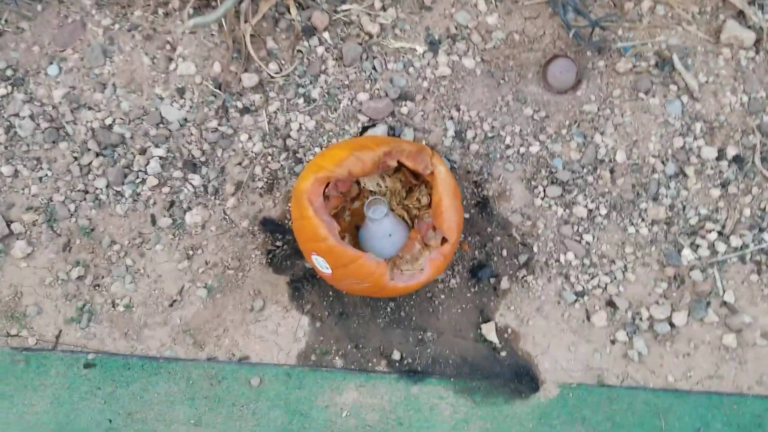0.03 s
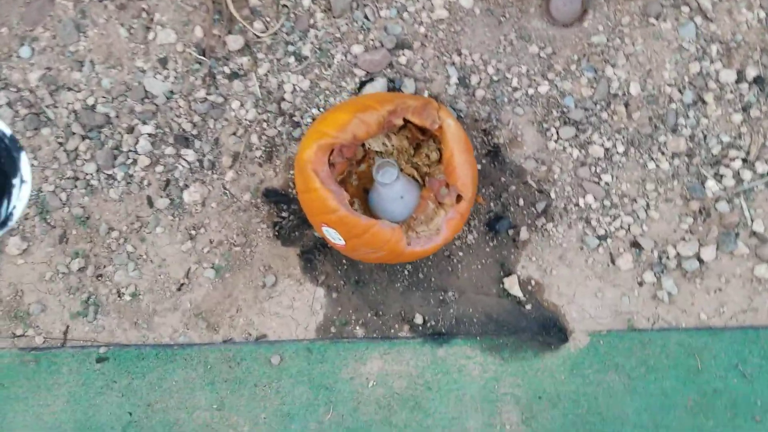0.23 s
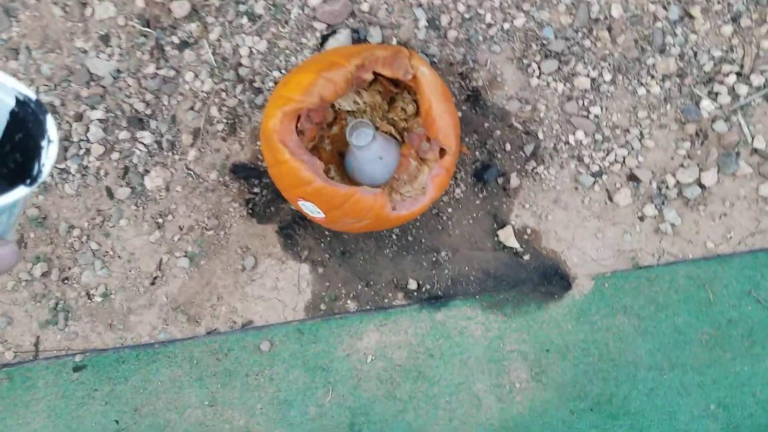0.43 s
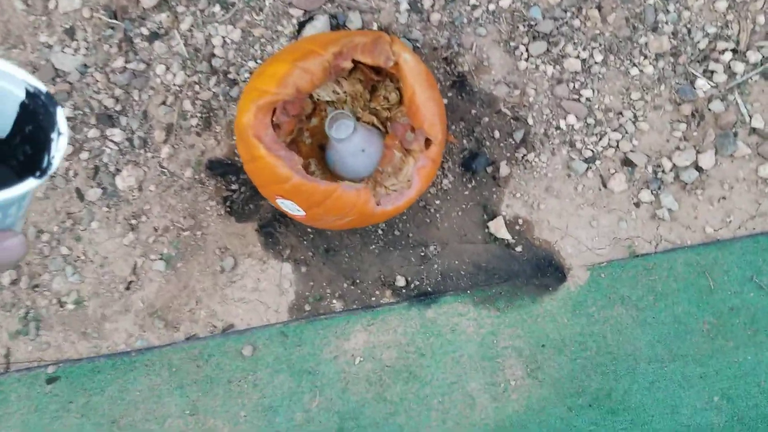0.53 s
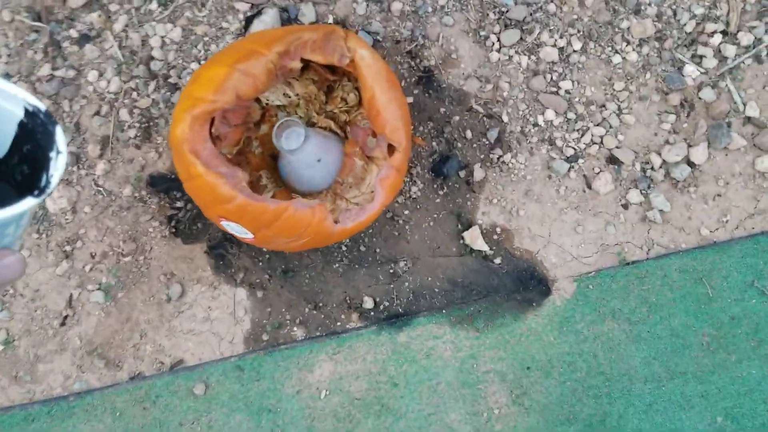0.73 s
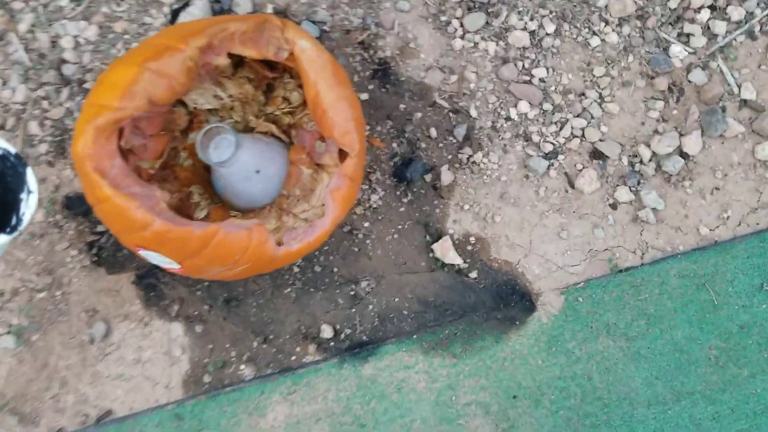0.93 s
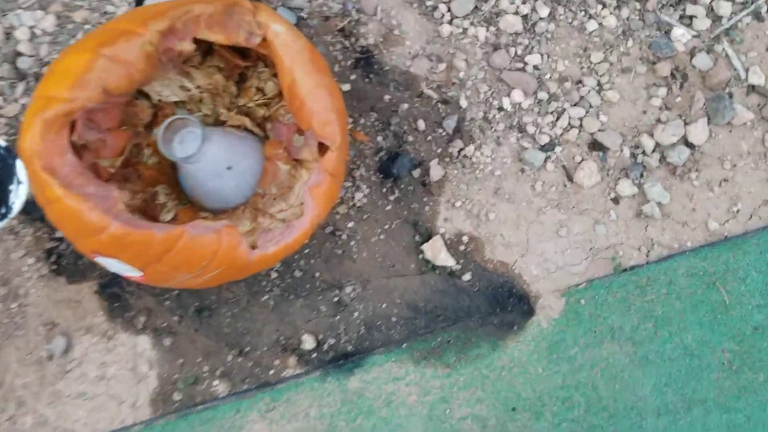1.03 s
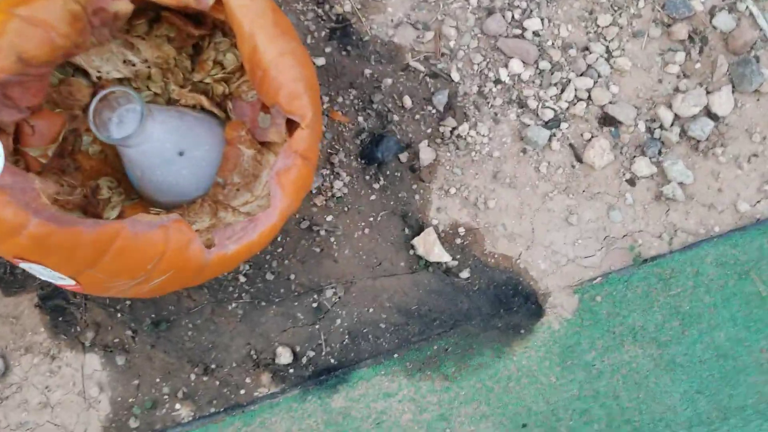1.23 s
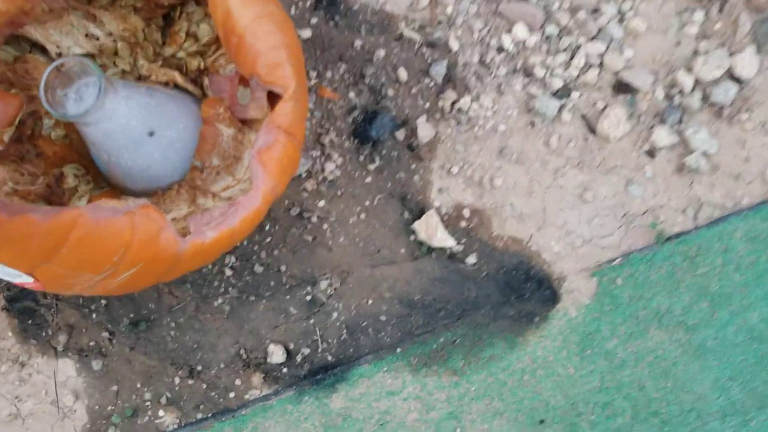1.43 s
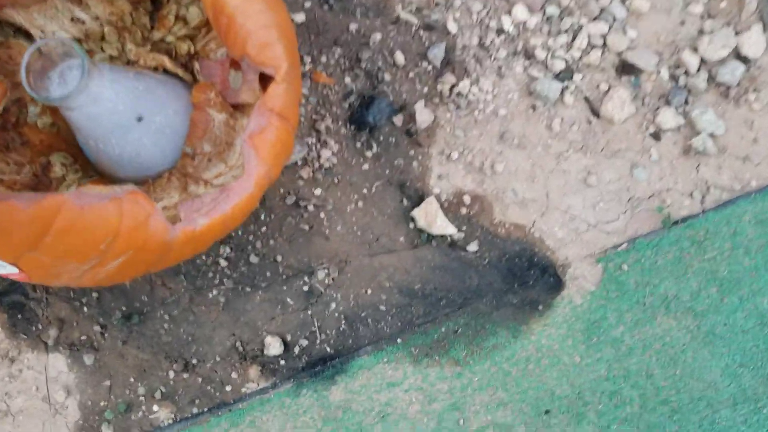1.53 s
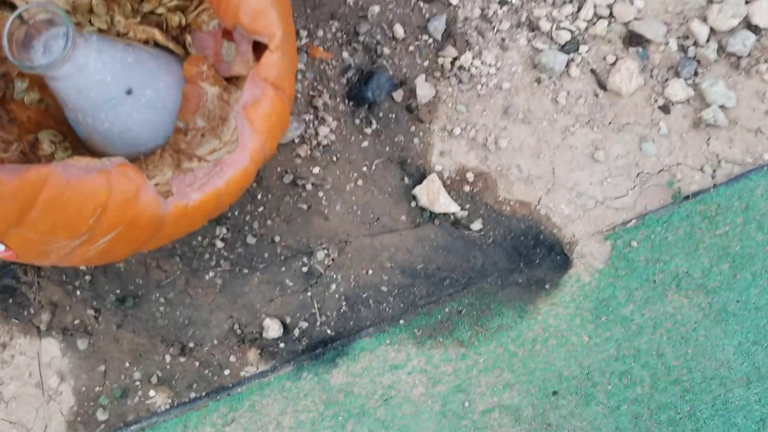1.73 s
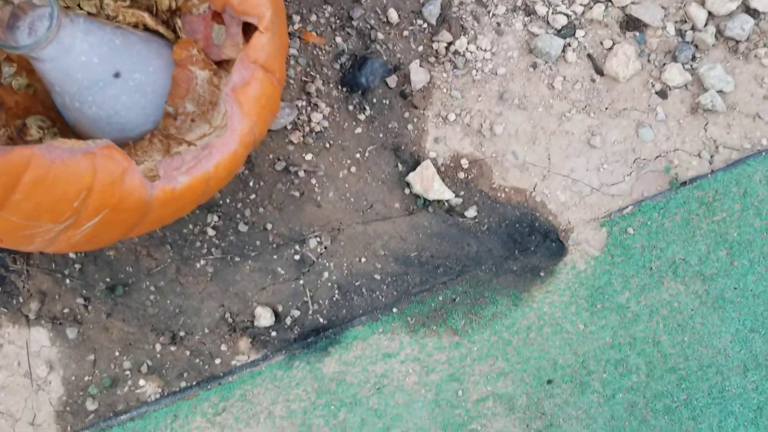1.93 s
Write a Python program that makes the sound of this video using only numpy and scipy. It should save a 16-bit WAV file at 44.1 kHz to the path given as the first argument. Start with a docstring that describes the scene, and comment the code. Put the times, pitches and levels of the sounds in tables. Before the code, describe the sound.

Fizzy hissing rises for about a second and dies away over low wind rumble.

```python
"""Outdoors, close to the ground: a fizzing hiss swells for about a second and fades.
The hiss is a jet of noise ringing at a few pitches, with a faint thin whistle before and after.
Swirls of moving air buffet the two ports (sound openings) of a hand-held microphone, and now and
then a big swirl thumps them. Two tiny hard contacts make dry ticks over a quiet background."""
import sys
import numpy as np
from scipy import signal
from scipy.fft import rfft, irfft, next_fast_len
from scipy.io import wavfile
from scipy.ndimage import uniform_filter1d, map_coordinates

SR = 44100
rng = np.random.default_rng(int(sys.argv[2]) if len(sys.argv) > 2 else 0)


def pcm_store(signal):
    """Save signal as 16-bit PCM."""
    levels = np.round(np.clip(np.atleast_2d(signal), -1, 1) * 32767)
    wavfile.write(sys.argv[1], SR, levels.astype(np.int16).T)


N = 88200  # 2 seconds

# Tone of small, fast swirls of air: pitch_hz, relative_db
FLUTTER_TONE = [(60, -20), (150, -3), (240, -1), (400, -6.5), (620, -24.5), (1200, -40.5), (4000, -52)]


def hiss():
    """A jet of noise with a ringing body and an airy top; it reaches the left port first."""
    # The swell and fade: time_s, level_db, top_boost_db
    swell = [(.24, -69.5, -3), (.32, -54, -2), (.39, -58, -2), (.55, -47, -1), (.68, -46.5, 0),
             (.85, -43.5, -2), (1.0, -45.5, -1), (1.1, -44, -4.5), (1.15, -51, -4), (1.22, -54, -5),
             (1.28, -62.5, -2), (1.335, -68, 6), (1.42, -64, 2.5), (2, -69.5, -15)]
    # Broad ringing peaks of the body: pitch_hz, relative_db
    body_tone = [(500, -13), (1000, -13), (1600, -14.5), (2100, -4), (2750, -10.5), (3300, -9.5),
                 (3900, -9), (4400, -4.5), (4780, 1), (5100, -6), (5500, -8), (6100, -19), (6900, -7),
                 (8000, -21), (10000, -24), (16000, -22)]
    # Tone of the airy top: pitch_hz, relative_db
    top_tone = [(4000, -38), (7000, -9), (9000, -11), (10000, -18), (11300, -3.5), (12500, 1), (14000, -4),
                (15700, -1)]
    # How alike left and right are: pitch_hz, likeness (1 = the same)
    likeness = [(700, 0.25), (2050, 1), (3300, 0.37), (4800, 1), (8000, 0.77), (13000, 0.46)]
    # How far the left wave runs ahead of the right: pitch_hz, lead_radians
    left_lead = [(1000, 0), (2100, -.1), (3000, 1.1), (3900, 1.0), (4800, 1.5), (5200, 1.7), (5700, 3),
                 (8300, 3.3), (10000, 6), (12700, 6.2), (15000, 7.5)]
    level_db, top_db = curves(swell)
    flow_db = level_db + .6 * wobble(25)
    ringing = rush(body_tone, likeness, patchy_db=2.12) + amp(-8.5) * sharp_ring()
    body = amp(flow_db) * pan(-2) * ringing
    top = amp(top_db + flow_db) * pan(2.5) * rush(top_tone, likeness, patchy_db=2.5)
    head_start = lambda hz: np.exp(.5j * np.array([[1], [-1]]) * along(left_lead, hz))
    return filtered(body + top, head_start)


def sharp_ring():
    """The sharpest ring in the hiss: a narrow band of noise that wanders in pitch."""
    # Middle of the band: time_s, pitch_hz
    pitch_path = [(.3, 4750), (.55, 4796), (.68, 4840), (.77, 4730), (.86, 4653), (.93, 4770), (1.03, 4700),
                  (1.12, 4780), (1.22, 4560)]
    pitch_hz, = curves(pitch_path)
    half_width_hz = 160
    keep_lows = lambda hz: 1 / np.hypot(1, (hz / half_width_hz) ** 2)
    slow_a, slow_b = filtered(rng.standard_normal((2, N)), keep_lows)
    phase = 2 * np.pi * np.cumsum(pitch_hz) / SR
    return unit(slow_a * np.cos(phase) + slow_b * np.sin(phase))  # lifts the noise to that pitch


def whistles():
    """Brief, thin, unsteady tones while the flow is weak."""
    # One row per whistle: middle_s, half_length_s, pitch_hz, level_db
    notes = [(0.079, 0.036, 4490, -62), (1.294, 0.084, 3210, -66.5), (1.34, 0.028, 4600, -60),
             (1.52, 0.042, 4850, -69)]
    waver_hz = 48
    out = np.zeros(N)
    for middle_s, half_length_s, pitch_hz, level_db in notes:
        t = np.arange(N) / SR - middle_s
        phase = 2 * np.pi * np.cumsum(pitch_hz + waver_hz * wobble(300)) / SR
        flicker_db = 2 * wobble(80)
        fade = np.exp(-(t / half_length_s) ** 2)
        out += amp(level_db + flicker_db) * fade * np.sqrt(2) * np.sin(phase)
    return out * pan(2.3)


def buffeting():
    """Air on the ports makes a deep rumble and a lighter flutter, shared more evenly between them."""
    # Strength of the air: time_s, level_db, left_minus_right_db
    air = [(0, -57, -22.5), (.1, -48, -18), (.16, -44, 14), (.3, -48, 8), (.35, -48, -15), (.47, -44, -4),
           (.57, -30.5, -17), (.68, -39.5, -3), (.74, -28.5, 1), (.86, -39.5, -7), (1.0, -30.5, 1),
           (1.09, -37, -17), (1.29, -35.5, 2.5), (1.44, -45, -21), (1.51, -33, -16), (1.65, -50.5, -19),
           (1.75, -41.5, -17), (1.88, -52.5, -26), (2.0, -39.5, 11.5)]
    # Tone of slow swirls: pitch_hz, relative_db
    rumble_tone = [(20, -35.5), (50, 4), (85, -2.5), (130, -1.5), (220, -16.5), (400, -32.5), (800, -47.5),
                   (2000, -98)]
    level_db, pan_db = curves(air)
    gust_db = level_db - level_db.mean()
    flutter_db = -10.5 + 1.43 * gust_db  # in a gust, fast swirls grow more than slow ones
    rumble = amp(gust_db) * pan(pan_db) * swirls(rumble_tone, lumpy_db=3.0)
    flutter = amp(flutter_db) * pan(0.52 * pan_db) * swirls(FLUTTER_TONE, lumpy_db=6.5)
    return amp(level_db.mean()) * (rumble + flutter)


def swirls(tone, lumpy_db):
    """Churning air, steady overall, in quick lumps that differ from port to port."""
    noise = rush(tone, [(100, 0.033)], patchy_db=3.5)
    local_power = np.abs(uniform_filter1d(noise ** 2, size=2600, axis=1))
    steady = noise / np.sqrt(local_power + 1e-9)
    lumps = amp(lumpy_db * np.array([wobble(45.14), wobble(45)]))
    return unit(steady * lumps)


def thumps():
    """Each big swirl briefly swings the air pressure at the ports and carries a little flutter."""
    # One row per swirl: middle_s, level_db, pitch_hz, half_length_s, left_minus_right_db
    big_swirls = [(0.203, -29.5, 95, 0.0047, -0.5), (.246, -35.5, 55.4, 0.0078, 5),
                  (.388, -30, 72, 0.0051, 1), (.479, -26, 93.5, 0.0075, 4), (.563, -29, 85.6, 0.01, -13),
                  (.72, -21, 92, 0.0058, 1), (.752, -27.5, 216, 0.0094, -1), (.795, -24, 112, 0.005, -8),
                  (.905, -28, 80.5, 0.0057, -6), (.974, -19.5, 166.4, 0.003, -1.5),
                  (1.185, -27.5, 139.5, 0.0052, -9), (1.26, -22, 126.8, 0.0026, -4),
                  (1.327, -17.5, 93, 0.0068, 0), (1.502, -31, 122, 0.0093, -32),
                  (1.733, -32, 74.5, 0.0052, -9), (1.803, -30.5, 60.3, 0.0058, -20)]
    out = np.zeros((2, N))
    flutter = amp(-12.5) * rush(FLUTTER_TONE, [(100, 0.36)], patchy_db=0)
    for middle_s, level_db, pitch_hz, half_length_s, pan_db in big_swirls:
        t = np.arange(N) / SR - middle_s
        start_turn, right_shift = rng.random(2)
        phase = 2 * np.pi * (pitch_hz * t + start_turn)
        swing = np.sin(phase + np.array([[0], [1.5]]) * right_shift)  # the ports are out of step
        fade = 1 / np.cosh(np.clip(t / half_length_s, -20, 20))
        out += amp(level_db) * pan(pan_db) * fade * (swing + flutter)
    return out


def ticks():
    """Tiny hard contacts: a short ring and a rough crack, gone within milliseconds."""
    # One row per tick: start_s, level_db, left_minus_right_db, treble_limit_hz
    contacts = [(.925, -26, 1, 1297), (1.858, -19, -13.5, 10000)]
    # Tones that each contact sets ringing: pitch_hz, relative_db
    ring_tones = [(750, -2), (1700, -1.5), (2900, -3.5), (4600, 0), (7000, -9), (12500, 5)]
    ring_s, crack_db = 0.0021, -13
    out = np.zeros((2, N))
    for start_s, level_db, pan_db, treble_limit_hz in contacts:
        t = np.maximum(np.arange(N) / SR - start_s, 0)
        ring = sum(amp(db) * np.sin(2 * np.pi * hz * t) for hz, db in ring_tones)
        crack = amp(crack_db) * rng.standard_normal((2, N))
        fade = (t > 0) * amp(-60 * t / ring_s)
        tick = filtered((ring + crack) * fade, lambda hz: 1 / (1 + 1j * hz / treble_limit_hz) ** 2)
        out += amp(level_db) * pan(pan_db) * tick / np.abs(tick).max()
    return out


def background():
    """Distant outdoor noise and a faint high fizz."""
    # Loudness of the distant noise: time_s, level_db
    far_levels = [(0, -53.5), (.25, -53.5), (.7, -51), (1.3, -51), (1.7, -52.5), (2, -49.5)]
    # Its tone: pitch_hz, relative_db
    far_tone = [(30, 15), (120, -8), (380, 3), (650, 1), (1100, -0.5), (1600, -2.5), (2300, -3),
                (3200, -11.5), (4600, -16.5), (5700, -24), (7000, -18), (8300, -32.5), (16000, -46)]
    # How alike its left and right are: pitch_hz, likeness
    far_likeness = [(300, 0.48), (700, 0.42), (1400, -0.51), (3000, 0.27)]
    # Loudness of the fizz: time_s, level_db
    fizz_levels = [(0, -64.5), (.22, -63.5), (1.3, -59), (1.55, -58.5), (1.8, -59), (2, -58)]
    # Its tone: pitch_hz, relative_db
    fizz_tone = [(2000, -21), (4600, -5.5), (6000, -3), (8300, -9.5), (10000, -5.5), (12500, -4.5),
                 (15700, -1.5)]
    far_db, = curves(far_levels)
    fizz_db, = curves(fizz_levels)
    far = amp(far_db + .8 * wobble(9)) * rush(far_tone, far_likeness, patchy_db=2.47)
    fizz_gain = amp(fizz_db + 0.48 * wobble(13.6)) * pan(5.6)
    return far + fizz_gain * rush(fizz_tone, [(5000, 0.0061)], patchy_db=3)


def rush(tone, likeness, patchy_db):
    """Stereo noise of strength 1, with louder and softer patches scattered over pitch and time."""
    grid = signal.stft(rng.standard_normal((2, N)), nperseg=512)[2]
    patches = uniform_filter1d(rng.standard_normal(grid.shape[1:]), size=4, axis=0)  # blur in pitch
    patches = uniform_filter1d(patches, size=8, axis=1)  # blur in time
    pair = signal.istft(grid * amp(patchy_db * unit(patches)), nperseg=512)[1][:, :N]

    def split(hz):
        """The more alike left and right are, the more of the noise they share."""
        angle = np.arccos(np.clip(along(likeness, hz), -1, 1)) / 2
        return amp(along(tone, hz)) * [np.cos(angle), np.sin(angle)]

    shared, opposite = filtered(pair, split)
    return unit(np.array([shared + opposite, shared - opposite]))


def amp(db):
    """Turn decibels into a number to multiply by."""
    return 10 ** (np.asarray(db) / 20)


def unit(x):
    """Scale a signal to an average strength (rms) of 1."""
    return x / np.sqrt(np.mean(x ** 2) + 1e-20)


def along(points, hz):
    """Read between (pitch_hz, value) points, with octaves evenly spaced."""
    pitches, values = np.transpose(points)
    return np.interp(np.log(hz + 1), np.log(pitches + 1), values)


def curves(rows):
    """One value per sample for each column after the time."""
    times, *columns = np.transpose(rows)
    return [np.interp(np.arange(N) / SR, times, column) for column in columns]


def wobble(rate):
    """A smooth curve through `rate` random values a second."""
    return map_coordinates(rng.standard_normal(N), [np.arange(N) * rate / SR + 2])


def pan(db):
    """Make the left `db` louder than the right, keeping the total power."""
    gains = amp(np.array([[1], [-1]]) * db / 2)
    return gains / np.sqrt(np.mean(gains ** 2, axis=0))


def filtered(x, response):
    """Scale and shift each pitch in x by response(hz)."""
    size = next_fast_len(N + SR // 2)
    return irfft(rfft(x, size) * response(np.fft.rfftfreq(size, 1 / SR)), size)[..., :N]


def scene():
    """All the sounds together at the two ports."""
    return hiss() + whistles() + buffeting() + thumps() + ticks() + background()


def record(dry):
    """The microphone passes nothing above its highest pitch."""
    highest_hz = 15800
    return filtered(dry, lambda hz: hz < highest_hz)


dry = scene()
out = record(dry)
pcm_store(out)
```